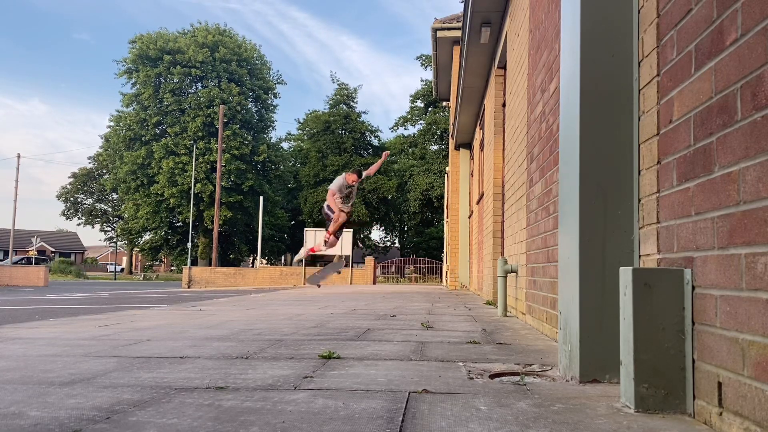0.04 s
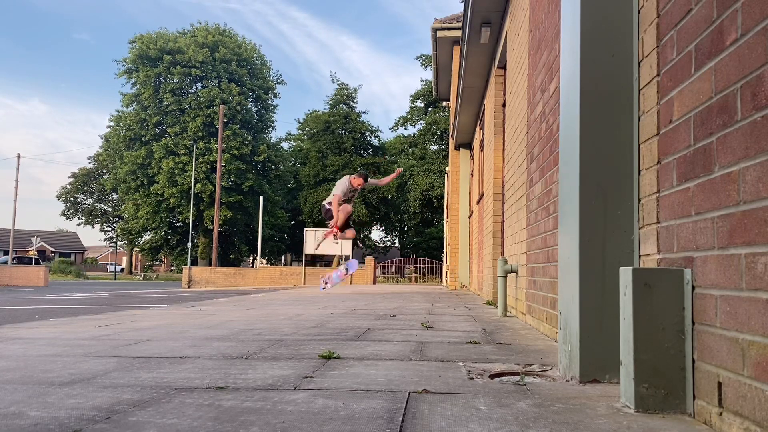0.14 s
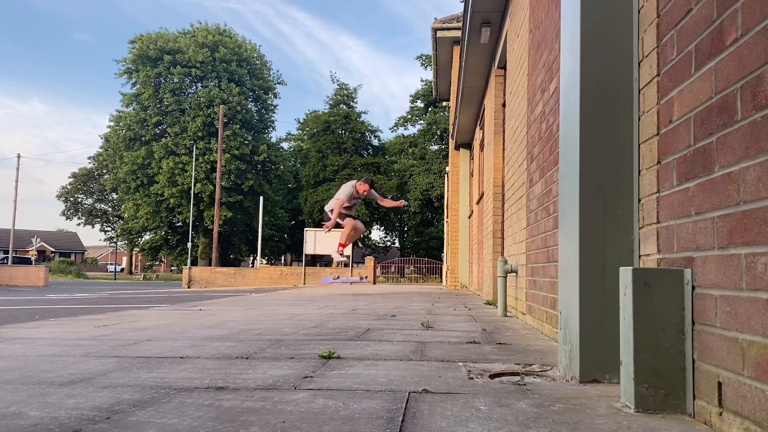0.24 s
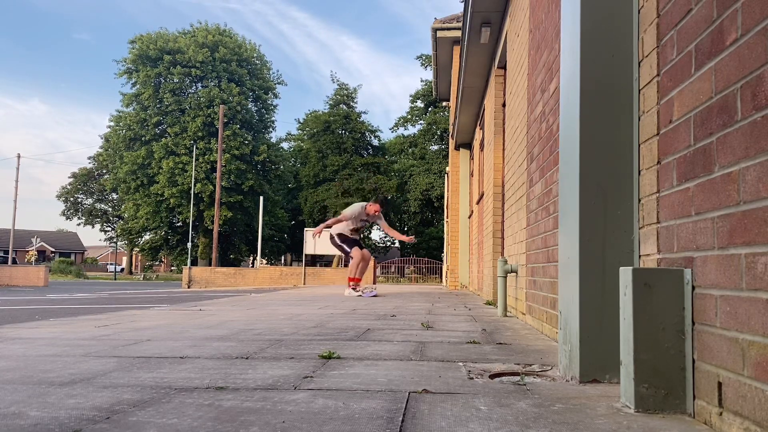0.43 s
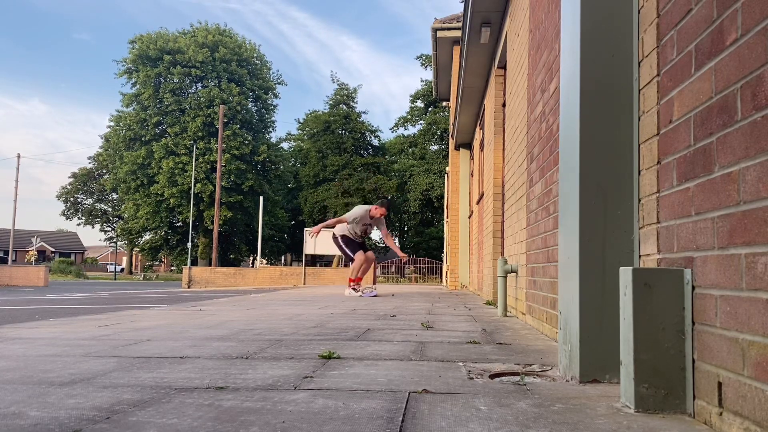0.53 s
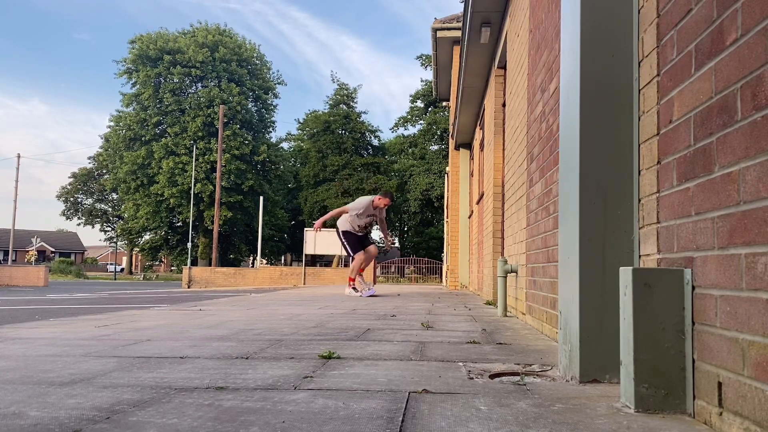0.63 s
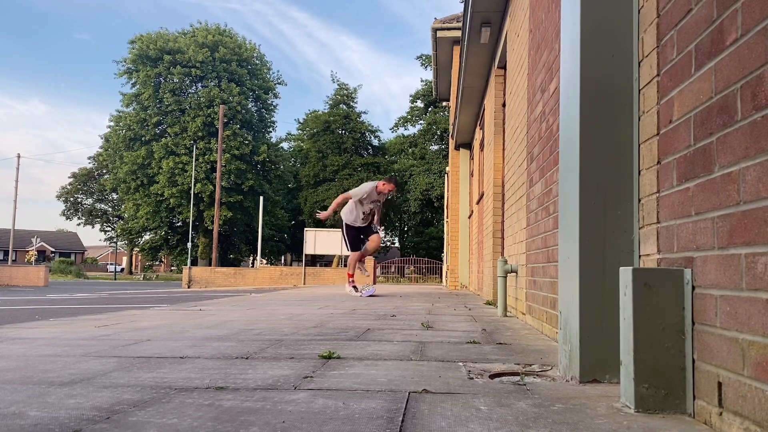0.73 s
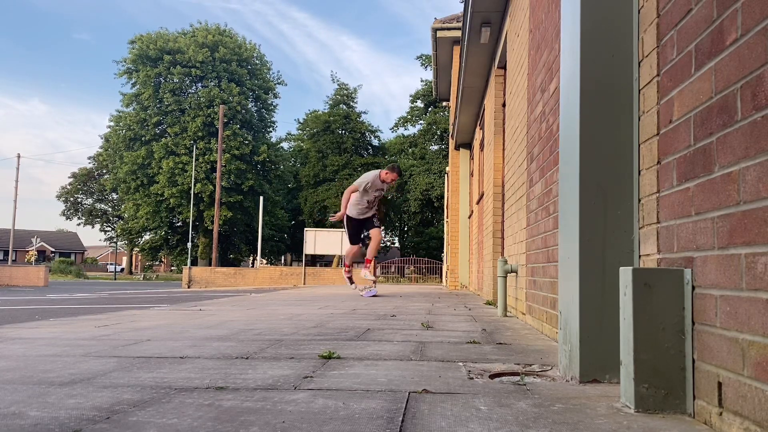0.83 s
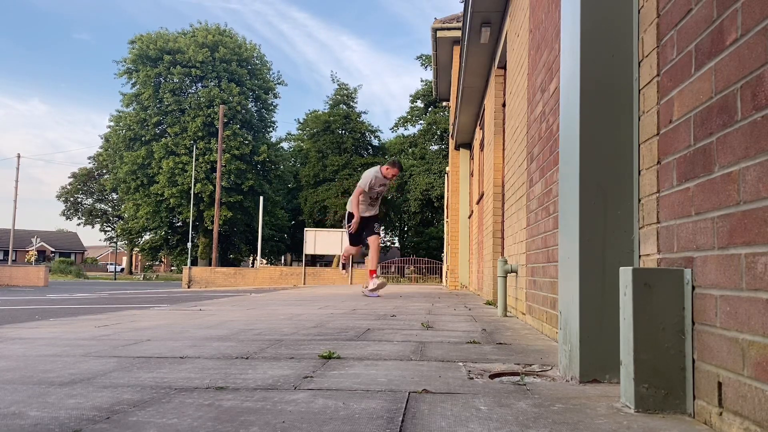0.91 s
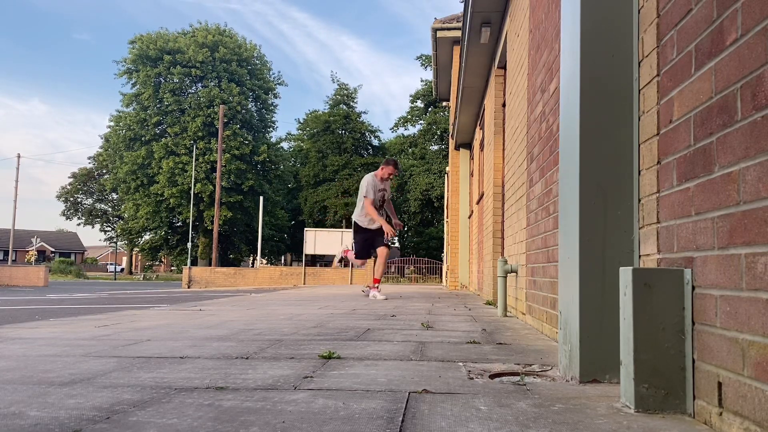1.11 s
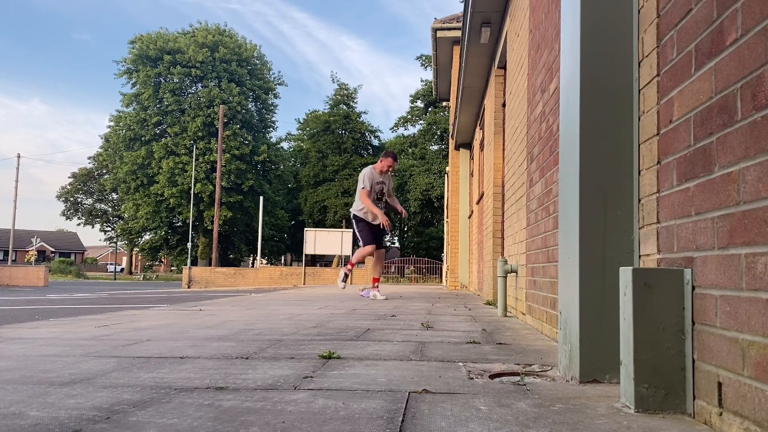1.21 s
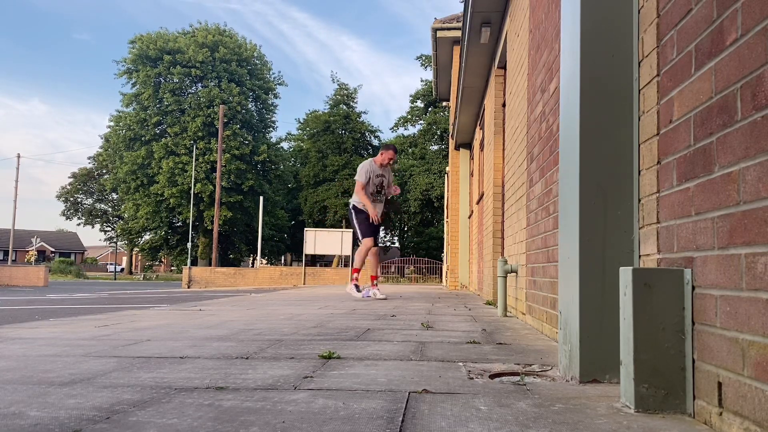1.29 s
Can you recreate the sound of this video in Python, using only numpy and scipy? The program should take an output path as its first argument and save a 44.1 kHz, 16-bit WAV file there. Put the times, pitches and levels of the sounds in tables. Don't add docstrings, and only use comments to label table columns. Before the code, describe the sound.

Three hard, dry wooden clacks from a skateboard in quick succession, with a brief shoe scuff between, then bumpy wheel rolling that fades and a light footstep, over faint distant traffic with short yard echoes, heard in stereo.

```python
import sys
import numpy as np
from scipy import signal
from scipy.fft import rfft, irfft
from scipy.io import wavfile
from scipy.ndimage import uniform_filter1d

SR = 44100
rng = np.random.default_rng(int(sys.argv[2]) if len(sys.argv) > 2 else 0)


def dump(signal):
    limited = np.clip(np.atleast_2d(signal).T, -1, 1)
    pcm = np.round(limited * 32767).astype(np.int16)
    wavfile.write(sys.argv[1], SR, pcm)


def gain_from_db(level_db):
    decades = np.asarray(level_db, float) / 20
    return 10 ** decades


N = 59535
RADIATES_ABOVE_HZ, MOST_CYCLES = 235, 60


def evened(x):
    return x / np.sqrt(np.mean(x ** 2) + 1e-20)


def read(points, hz):
    f, value = np.transpose(points)
    return np.interp(np.log(hz + 1), np.log(f + 1), value)


def filtered(x, spectrum):
    return irfft(rfft(x) * gain_from_db(read(spectrum, np.fft.rfftfreq(N, 1 / SR))), N)


def coloured(x, spectrum):
    return evened(filtered(x, spectrum))


def radiated(x, above_hz=RADIATES_ABOVE_HZ):
    return signal.sosfilt(signal.butter(4, above_hz, "high", fs=SR, output="sos"), x)


def limited(t60, hz):
    return np.clip(t60, .001, MOST_CYCLES / hz)


def ring(drive, modes, above_hz=RADIATES_ABOVE_HZ):
    t = np.arange(8000) / SR
    body = np.zeros(len(t))
    for hz, db, t60 in modes:
        body += gain_from_db(db - 60 * t / limited(t60, hz)) * np.sin(2 * np.pi * hz * t)
    contact_s = .0002
    body = body * (1 - np.exp(-(t / contact_s) ** 2))
    return radiated(signal.fftconvolve(drive, body)[:N], above_hz)


def resonance(drive, hz, width_hz):
    t60 = np.log(1000) / np.pi / width_hz
    return [(hz, 0, t60)] if drive is None else evened(ring(drive, [(hz, 0, t60)]))


# f/Hz, density/dB per Hz
TOWN_SPECTRUM = [(25, -16), (38, 1), (100, -4.5), (660, -15), (1010, -14.5), (1560, -21.5), (11000, -57.5),
                 (14500, -74)]
# t/s, bass level/dB, wash level/dB
TOWN_SWELL = [(0, -32.5, -5), (.2, -43, -0.5), (.5, -59, 7), (.7, -38, 2.5), (1.1, -37, -4.5),
              (1.221, -44, -3), (1.35, -40, -7)]
# f/Hz, coherence/1
TOWN_COHERENCE = [(60, 0.97), (180, 0.18), (400, 0.85), (800, 0.15), (1650, 0.12), (5000, 0.083)]


def town():
    hop, size = 256, 1024
    frames, hz = N // hop + 5, np.fft.rfftfreq(size, 1 / SR)
    a, b, c, d, patches = rng.standard_normal((frames, size // 2 + 1, 5)).T
    patches = uniform_filter1d(patches, size=8, axis=0)
    patches = evened(uniform_filter1d(patches, size=10, axis=1))
    s, bass_db, wash_db = np.transpose(TOWN_SWELL)
    t = np.arange(frames) * hop / SR - 512 / SR
    low = 1 / (1 + (hz[:, None] / 160) ** 4)
    swell = low * np.interp(t, s, bass_db - bass_db[0]) + (1 - low) * np.interp(t, s, wash_db)
    same = np.clip(read(TOWN_COHERENCE, hz), -1, 1)[:, None]
    left = a + 1j * b
    right = same * left + np.sqrt(1 - same ** 2) * (c + 1j * d)
    left_lead = np.exp(2j * np.pi * hz * 19 / SR)[:, None]
    z = np.array([left * left_lead, right])
    z = z * gain_from_db(read(TOWN_SPECTRUM, hz)[:, None] + 0.81 * patches)
    scale = np.std(signal.istft(z, nperseg=size, noverlap=size - hop)[1])
    wash = signal.istft(z * gain_from_db(swell), nperseg=size, noverlap=size - hop)[1][:, :N] / scale
    hum_mode = resonance(None, hz=147, width_hz=2.5)
    hum = evened(ring(rng.standard_normal(N), hum_mode, above_hz=51))
    return gain_from_db(-37.5) * wash + gain_from_db(-51) * hum


# f/Hz, t60/s
YARD_DECAY = [(100, 0.51), (500, 0.36), (1500, 0.15), (4000, 0.19), (10000, 0.28)]


def yard(x):
    size, spacing = SR // 2, 20
    taps = np.zeros((2, size))
    at = np.arange(400, size - spacing, spacing)
    at = at + rng.integers(0, spacing, (2, len(at)))
    np.put_along_axis(taps, at, rng.choice([-1., 1.], at.shape), 1)
    hz, t, z = signal.stft(taps, SR, nperseg=256)
    tilt_db = 1 * np.log2(hz[:, None] / 1000 + 0.13)
    shape_db = -60 * t / read(YARD_DECAY, hz)[:, None] + tilt_db
    tail = signal.istft(z * gain_from_db(shape_db), SR, nperseg=256)[1]
    return signal.fftconvolve(x[None], tail / np.linalg.norm(tail[0]), axes=1)[:, :N]


# peak t/s, level/dB, f/Hz, half length/s
THUMPS = [
    (0.229, -25.5, 82.5, 0.013),
    (0.356, -31.5, 91.8, 0.011),
    (0.437, -24, 78, 0.0079),
    (0.563, -36.5, 68, 0.016),
    (0.824, -36.5, 48.6, 0.055),
    (1.039, -33, 82.5, 0.0116),
    (1.085, -33, 56.5, 0.015),
    (1.214, -40.5, 65.7, 0.054),
]


def thumps():
    t = np.arange(N) / SR
    out = np.zeros(N)
    for s, db, hz, half in THUMPS:
        out += gain_from_db(db) * np.exp(-((t - s) / half) ** 2) * np.sin(2 * np.pi * hz * (t - s))
    return out


# middle t/s, half length/s, level/dB, f/Hz, width/Hz
SCUFFS = [
    (0.282, 0.0057, -41, 2060, 600),
    (0.296, 0.006, -31.5, 2500, 397),
    (0.29, 0.035, -35.5, 1500, 910),
    (0.728, 0.006, -45, 2260, 150),
    (0.942, 0.018, -48, 1750, 250),
    (1.125, 0.0043, -53, 2330, 500),
    (1.233, 0.0095, -48, 1500, 870),
]


def scuffs():
    t, noise = np.arange(N) / SR, rng.standard_normal(N)
    out = np.zeros(N)
    for s, half, db, hz, width in SCUFFS:
        out += gain_from_db(db) * np.exp(-((t - s) / half) ** 2) * resonance(noise, hz, width)
    return out


def struck(push, modes):
    t, out = np.arange(len(push)) / SR, np.zeros(len(push))
    for hz, db, t60 in modes:
        scatter_rad = 1 * rng.standard_normal(len(push))
        fed = push * np.exp(1j * scatter_rad)
        half_period = np.ones(int(SR / hz / 2) + 1)
        swing = signal.lfilter(half_period, [1, -gain_from_db(-60 / SR / limited(t60, hz))], fed)
        out += gain_from_db(db) * (swing * np.exp(2j * np.pi * hz * t)).imag / abs(swing).max()
    return radiated(out)


# f/Hz, density/dB per Hz
CRACK = [(250, -8), (500, -17.5), (1100, -1), (1900, -5.5), (3000, -14), (5000, -35), (9000, -34)]
# f/Hz, density/dB per Hz
RATTLE = [(1470, -6.5), (2500, -3.5), (3370, -10), (6010, -16), (9350, -20), (10900, -31), (13300, -31),
          (15600, -39), (16400, -76)]


def blows(table, modes, crack_db=-0.1):
    t, body, crack, rattle = np.arange(N) / SR, np.zeros(N), np.zeros(N), np.zeros(N)
    chatter_per_s, crack_t60 = 4000, 0.027
    lag_s, rise_s, rattle_t60 = .003, .002, .025
    clicks = abs(rng.standard_normal(N)) * (rng.random(N) < chatter_per_s / SR)
    for s, db, length, rattle_db in table:
        u = t - s
        begun = u >= 0
        firm = 2.94 * (np.cumsum(begun) == 1)
        chatter = clicks * begun * (u < length) * (1 - 0.8 * u / length) + firm
        at = np.argmax(begun)
        body[at:at + 6000] += gain_from_db(db) * struck(chatter[at:at + 6000], modes)
        crack_fall_db = 60 * np.maximum(u - length, 0) / crack_t60
        crack += gain_from_db(db + crack_db - crack_fall_db) * np.clip(u / 0.00032, 0, 1)
        v = np.maximum(u - lag_s, 0)
        rattle_fall_db = 60 * np.maximum(v - length / 2, 0) / rattle_t60
        rattle += gain_from_db(rattle_db - rattle_fall_db) * (np.minimum(v / rise_s, 1) + 0.88 * begun)
    grain = rng.standard_normal((2, N))
    crack = crack * coloured(grain[0], [(150, -48)] + CRACK)
    rattle = rattle * coloured(grain[1], [(1200, -44)] + RATTLE)
    return body + crack + rattle


# f/Hz, level/dB, t60/s
SOLE_MODES = [(225, 3, 0.071), (264, 5, 0.044), (459, 2, 0.047), (679, -0.5, 0.099), (804, -4, 0.09),
              (1320, 2, 0.017), (2293, 7.5, 0.045), (3130, 4.5, 0.02), (3490, 5.5, 0.015),
              (5000, -12, 0.012), (5940, -5, 0.0089)]
# t/s, level/dB, chatter length/s, rattle level/dB
SOLE_BLOWS = [
    (1.0295, -35.5, 0.0039, -40),
    (1.035, -37.5, 0.0022, -66),
    (1.046, -46, 0.0061, -72),
    (1.105, -54, 0.0014, -81),
    (1.188, -61, .004, -60),
]


def shoe():
    return blows(SOLE_BLOWS, SOLE_MODES, crack_db=1.5)


# t/s, level/dB
ROLL = [(.4, -53), (.48, -35), (.58, -40), (.72, -39.5), (.8, -45), (.87, -53.5), (1.0, -56), (1.15, -74)]
# f/Hz, density/dB per Hz
GRIND = [(170, -47), (260, -10.5), (330, -4), (495, -14), (2290, -18), (5930, -33.5), (9000, -40),
         (13000, -65)]
# f/Hz, level/dB, t60/s
RIDE_MODES = [(302.7, -8, 0.11), (382, -2, .07), (588, -7, 0.036), (758, -5.5, 0.037), (868, -35, 0.018),
              (1384, -3.5, 0.061), (1753, -10, 0.032), (2250, -29, .05)]


def rolling():
    s, db = np.transpose(ROLL)
    level_db = np.interp(np.arange(N) / SR, s, db, left=-99, right=-99)
    grit_per_s, grit_spread_db = 3500, 1.5
    grit = rng.standard_normal(N) * (rng.random(N) < grit_per_s / SR)
    grit = grit * gain_from_db(grit_spread_db * rng.exponential(1, N))
    grind = coloured(evened(grit) + rng.standard_normal(N), GRIND) * gain_from_db(level_db + 5)
    drum_db, follow = -11, 1
    drum = evened(ring(grit, RIDE_MODES)) * gain_from_db(db.max() + drum_db + follow * (level_db - db.max()))
    return grind + drum


# t/s, level/dB, chatter length/s, rattle level/dB
RIDE_BLOWS = [
    (.514, -37, 0.005, -78),
    (.528, -26.5, 0.0043, -39),
    (.54, -44, 0.014, -44.5),
    (.594, -44, .006, -62),
    (.606, -34.5, .006, -53),
    (.636, -25.5, 0.0076, -74),
    (.65, -32, 0.0088, -70),
    (.671, -31.5, 0.0019, -74),
    (.703, -32.5, 0.0095, -63),
    (.749, -31.5, 0.0033, -73),
]


def ride():
    return blows(RIDE_BLOWS, RIDE_MODES, crack_db=-16)


# f/Hz, level/dB, t60/s
LAND_MODES = [(306, -11, 0.1), (387.4, 0.5, 0.034), (556, -8, 0.033), (693, 1.5, 0.037), (776, -1.5, 0.068),
              (1045, -2, .05), (1707, -0.5, .04), (2030, -5, .05), (2680, 1.5, .04), (3044, 6.5, .03),
              (4095, -19, .03)]
# t/s, level/dB, chatter length/s, rattle level/dB
LAND_BLOWS = [
    (.4795, -26, 0.0039, -31.5),
    (.487, -25.5, 0.0037, -44),
    (.497, -47, 0.0037, -46),
]


def landing():
    return blows(LAND_BLOWS, LAND_MODES, crack_db=0.5)


# f/Hz, level/dB, t60/s
FLAT_MODES = [(274, 1, 0.025), (338, -9.5, 0.057), (493, 2, 0.022), (551, -6.5, 0.037), (739, -1.5, 0.095),
              (920, -8, 0.089), (1054, -7, 0.072), (1447, 1, 0.074), (1766, 5.5, 0.017), (1926, 4.5, 0.031),
              (2294, 2.5, 0.088), (3050, -4, 0.073), (4000, -4.5, 0.018)]
# t/s, level/dB, chatter length/s, rattle level/dB
FLAT_BLOWS = [
    (.3955, -14, 0.0042, -20),
    (.404, -20, 0.001, -41),
    (.41, -24.5, 0.0042, -31),
    (.417, -25.5, 0.0098, -37.5),
    (.432, -31.5, .006, -48),
]


def flat_slap():
    return blows(FLAT_BLOWS, FLAT_MODES)


# f/Hz, level/dB, t60/s
EDGE_MODES = [(309, -6, 0.06), (560, -2.5, 0.018), (740, -34, 0.12), (1108, 6, 0.014), (1306, 5, 0.06),
              (1618, 9, 0.0077), (1770, 5, 0.034), (2016, -1, 0.036), (2285, 2, 0.0087),
              (2593, 2.5, 0.0068), (3400, -11.5, 0.034), (4800, -5, .015)]
# t/s, level/dB, chatter length/s, rattle level/dB
EDGE_BLOWS = [
    (.3365, -15.5, 0.0074, -22.5),
    (.354, -26, 0.0023, -39),
    (.369, -33.5, 0.02, -40),
]


def edge_clip():
    return blows(EDGE_BLOWS, EDGE_MODES)


# f/Hz, level/dB, t60/s
TAIL_MODES = [(262, -1, 0.063), (503, -3.5, 0.016), (715, -5, 0.11), (934, -0.5, 0.021), (1247, -7.5, 0.06),
              (1500, 2.5, 0.047), (1750, -3, 0.04), (2018, -2, 0.043), (2254, -5, 0.04), (2740, -27, .03),
              (3127, -11, 0.079), (3540, -47, 0.017)]
# t/s, level/dB, chatter length/s, rattle level/dB
TAIL_BLOWS = [
    (.001, -41.5, 0.018, -47.5),
    (.2008, -13.5, 0.0071, -24.5),
    (.2145, -27, 0.0077, -61),
    (.226, -33.5, 0.011, -71),
]


def tail_pop():
    return blows(TAIL_BLOWS, TAIL_MODES)


# f/Hz, level/dB
LEAN = [(60, -1.5), (200, -3.5), (550, 1), (1300, -1), (2500, -2), (4970, 1.5), (9000, -.5)]


def ports(x, phase):
    hz = np.fft.rfftfreq(N, 1 / SR)
    f, rad = np.transpose(phase)
    half = gain_from_db(read(LEAN, hz) / 2) * np.exp(.5j * np.interp(hz, f, rad))
    return irfft(rfft(x) * np.array([half, 1 / half]), N)


# f/Hz, level/dB
MIC = [(7000, 0), (8800, -10), (11500, -0.5), (13200, -19)]


def microphone(x):
    return filtered(x, MIC)


# f/Hz, phase/rad
NEAR_PHASE = [(0, 0), (600, 1.4), (1290, .5), (2300, 1.2), (4220, 1.5), (7900, -3.2), (10200, -6.2),
              (16500, -13)]
# f/Hz, phase/rad
ROLL_PHASE = [(0, 0), (340, 1), (700, 2.3), (1300, 3.9), (2330, 6.9), (6800, 18.4), (10000, 13), (16500, 6)]


def scene():
    background = town()
    deck = tail_pop() + edge_clip() + flat_slap() + scuffs()
    knocks = landing() + ride() + shoe()
    away = gain_from_db(2.0) * knocks + gain_from_db(-6.5) * rolling()
    straight_share = .6
    near = deck + thumps() + straight_share * (knocks + rolling())
    echo = gain_from_db(-9.5) * yard(deck + away)
    return ports(near, NEAR_PHASE) + ports(away, ROLL_PHASE) + echo + background


def top_cut(x):
    return signal.sosfilt(signal.butter(12, 16850, fs=SR, output="sos"), x)


def record(dry):
    mix = 1.074 * np.tanh(microphone(dry) / 1.043)
    return top_cut(mix)


dry = scene()
out = record(dry)
dump(out)
```